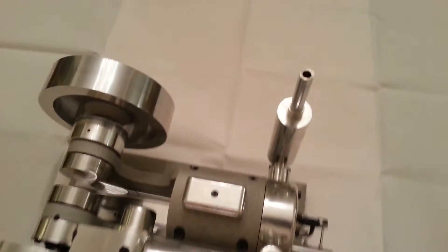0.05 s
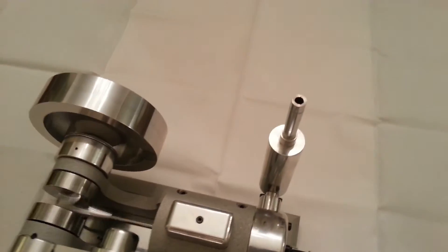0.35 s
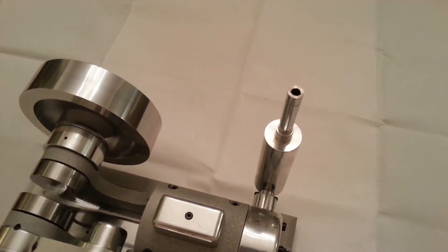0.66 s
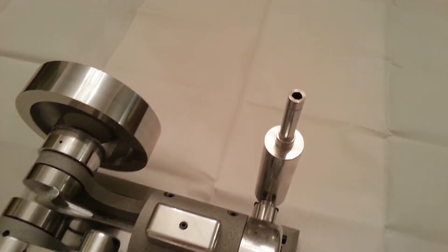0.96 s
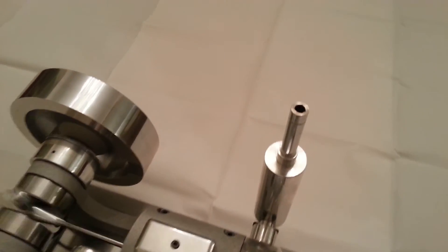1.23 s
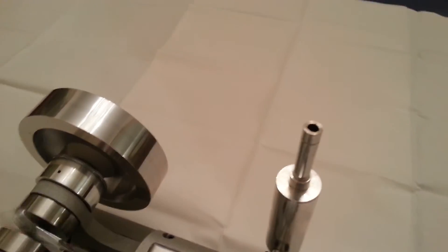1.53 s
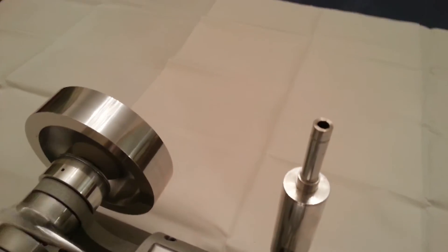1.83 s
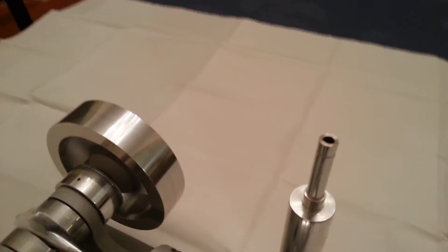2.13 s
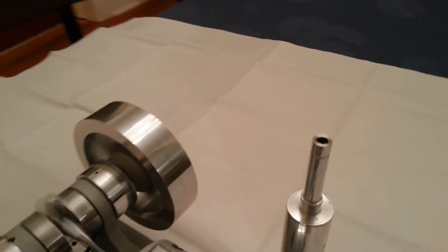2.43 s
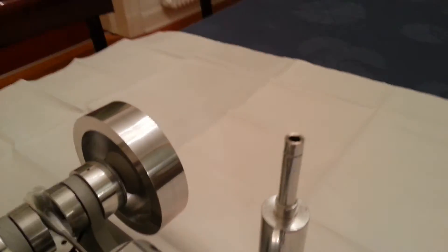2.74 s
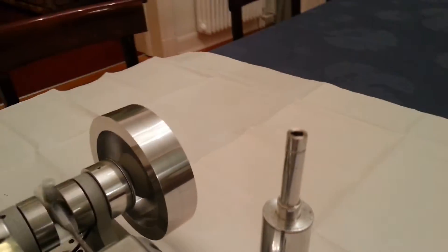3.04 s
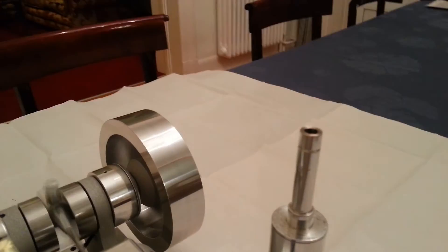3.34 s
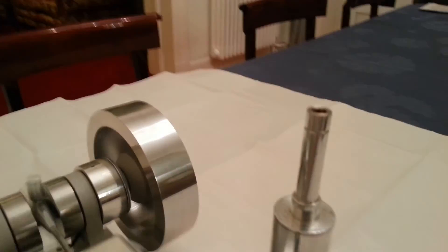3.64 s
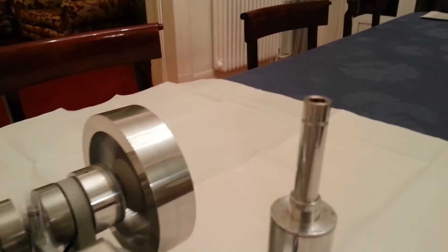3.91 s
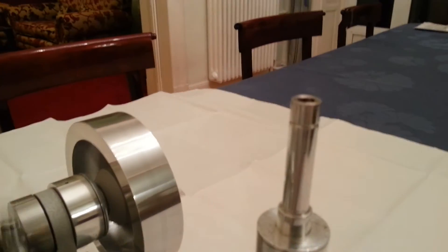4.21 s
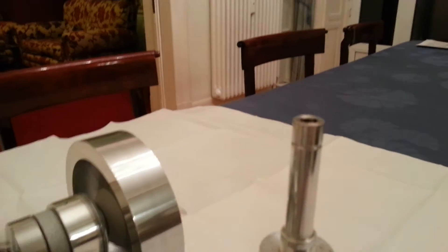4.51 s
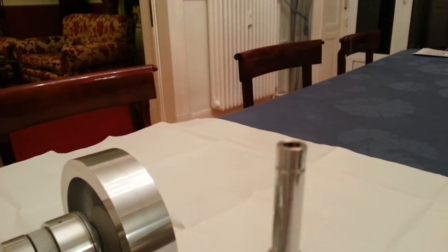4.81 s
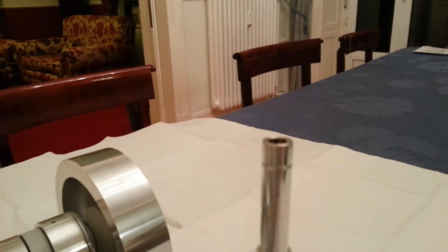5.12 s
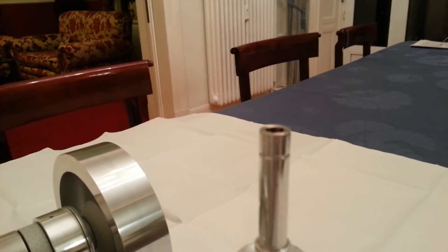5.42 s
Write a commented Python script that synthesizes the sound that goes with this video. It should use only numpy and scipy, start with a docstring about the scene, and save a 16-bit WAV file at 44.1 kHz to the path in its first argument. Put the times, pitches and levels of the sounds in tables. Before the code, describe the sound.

A small model engine runs close by with fast, regular pops over valve hiss and fine gear ticking in a room.

```python
"""A small flywheel model engine runs at about 6.6 cycles a second on a dining table, close to the
stereo microphones of a hand-held camera. Each cycle pops from the upright pipe with a crack of gas;
then the valve hisses, while the gear teeth tick and the table rumbles. Low throbs follow each pop
like its echo as the living room answers; the loudest pops thud, clip and make the limiter duck."""
import sys
import numpy as np
from scipy import signal
from scipy.fft import rfft, irfft, next_fast_len
from scipy.io import wavfile
from scipy.ndimage import uniform_filter1d, minimum_filter1d

SR = 44100
rng = np.random.default_rng(int(sys.argv[2]) if len(sys.argv) > 2 else 0)


def generate_wav(sig):
    """Save sig (samples, or channels by samples) to the path in sys.argv[1] as 16-bit PCM at SR."""
    pcm = np.round(np.clip(np.atleast_2d(sig).T, -1, 1) * 32767).astype(np.int16)
    wavfile.write(sys.argv[1], SR, pcm)


N = 249606
TIME = np.arange(N) / SR
FFT_SIZE = next_fast_len(N + SR)
FREQ = np.maximum(np.arange(FFT_SIZE // 2 + 1) * SR / FFT_SIZE, 1)


# The firings, close to the upright pipe.
# Each row: start in seconds, relative level of the pressure pulse in dB, that of the boom in dB.
PIPE_FIRINGS = [(.1032, -1, 6.5), (0.2509, -0.5, 4.5), (0.3971, 0.5, 7.5), (0.5454, 1, 8), (0.6965, 0, 6),
                (0.8479, -0.5, 4.5), (1.0016, -0.5, 4), (1.1549, -1, 11.5), (1.3096, 2.5, 8),
                (1.4645, 1, 11.5), (1.62, -1, 8.5), (1.774, 0.5, 13), (1.9275, 5, 20.5), (2.08, 1.5, 6.5),
                (2.2324, 1, 5.5), (2.384, 0.5, 5.5), (2.536, -1, 0), (2.688, -.5, 6), (2.8397, 0, 9.5),
                (2.991, 0, 9.5), (3.1408, 0.5, 4.5), (3.2915, 4, 8.5), (3.442, 2, 3.5), (3.5924, 2.5, 8.5),
                (3.744, 1.5, 6.5), (3.8957, 1, 5), (4.0472, 1, 2), (4.198, 0.5, 4.5), (4.3477, 1.5, 4),
                (4.4975, 0, -1.5), (4.649, 2, 8), (4.8008, 1, 8.5), (4.9527, 1.5, 12.5), (5.1045, 1.5, -8),
                (5.2577, 3, 3), (5.4104, 2, 3), (5.5628, 0.5, 5)]

def pops(boom_share=0.13, pop_db=-6, thud_db=-5):
    """A pressure pulse leaves the pipe and rings its air; booming firings push on for longer."""
    pulses, pushes = np.zeros((2, N))
    t = np.arange(SR // 100) / SR
    pulse = bump(t, peak=0.00065, width=0.00029)
    push = bump(t, peak=0.0016, width=0.00049)
    for start_s, pulse_db, boom_db in PIPE_FIRINGS:
        add(pulses, start_s, undb(pulse_db) * pulse)
        add(pushes, start_s, boom_share * (undb(boom_db) - undb(pulse_db)) * push)
    ringing = through(pulses, highpass(hz=162.6, width=49)) + through(pushes, highpass(hz=152, width=29))
    # a small opening radiates almost no bass
    radiated = through(ringing, highpass(hz=75, width=55))
    # a deep thud, much heavier on the strongest pops, as they overload the microphone
    overload = (np.maximum(pushes, 0) + 0.38 * pulses) ** 2
    thud = through(overload, band(hz=42, width=55))
    return undb(pop_db) * radiated + undb(thud_db) * thud


# High resonances of the gas crack at the pipe mouth, and lower ones down in the bore.
# Each row: centre in Hz, width in Hz, relative level at the left and right microphones in dB.
MOUTH_RESONANCES = [(5525, 740, 1.5, -4), (7864, 630, -10, 4.5), (10730, 680, -7.5, -4),
                    (13650, 634, -10.5, -8)]
BORE_RESONANCES = [(2030, 780, -14, -15), (3725, 630, -8, -13)]

def gas_cracks(bore_gain, open_s=0.0011, fall_s=0.0017, crack_db=-23, pan_db=-1.2,
               whistle_hz=6760, whistle_width=480, whistle_db=3, sag_hz_per_db=52,
               wander_hz=250, wander_db=2):
    """Gas bursts out behind each pulse, whistling at the mouth and ringing the bore; the jet wanders."""
    out, size = np.zeros((2, N)), 1024
    t = np.arange(size) / SR
    freq = np.arange(size // 2 + 1) * SR / size
    burst = np.minimum(t / open_s, 1) ** 2 * np.exp(-np.maximum(t - open_s, 0) / fall_s)
    wander = rng.standard_normal((len(PIPE_FIRINGS), 3))
    for (start_s, pulse_db, boom_db), (pitch, aim, grit) in zip(PIPE_FIRINGS, wander):
        force_db = 2.33 * pulse_db - 0.32 * boom_db  # a slow push cracks less
        hz = whistle_hz - sag_hz_per_db * pulse_db + wander_hz * pitch  # strong firings whistle lower
        whistle = (hz, whistle_width, whistle_db, whistle_db)
        mouth = undb(force_db) * resonances([*MOUTH_RESONANCES, whistle], freq)
        rasp_gain = bore_gain[int(start_s * SR)] * undb(pulse_db + wander_db * grit)
        bore = rasp_gain * resonances(BORE_RESONANCES, freq)
        jet = irfft(rfft(stereo_noise(likeness=0.4, size=size)) * np.hypot(mouth, bore))
        sides_db = (pan_db + wander_db * aim) * np.array([[1], [-1]]) / 2
        add(out, start_s, unit(burst * jet) * undb(crack_db + force_db + sides_db))
    return out


# The hiss of the valve from close by.
# Each row: frequency in Hz, relative level at the left and right microphones in dB.
VALVE_SPECTRUM = [(890, -2, -1), (1570, -7, -0.5), (2260, -3, -1.5), (2900, -2, -1), (3770, -0.5, -8),
                  (5500, 9, 7.5), (7200, -1, 11.5), (8300, -3.5, 2), (10000, 3, 4), (12600, -13, -1),
                  (14900, -34, -28)]

def valve_hiss(turn, opens=0.035, full=0.061, eases=0.48, shuts=0.51, hiss_db=-32, leak_db=-17):
    """Air rushes through the valve for the first half of the cycle and leaks a little for the rest."""
    valve = np.interp(turn % 1, [opens, full, eases, shuts], [0, 1, 1, 0])
    air = unit(through(stereo_noise(likeness=0.24, size=N), colour(VALVE_SPECTRUM)))
    return air * undb(hiss_db) * (valve + undb(leak_db))


def air_spit(turn, spit_db=-38):
    """At the height of the stroke the air is fastest and the hiss turns crisp."""
    flow = bump(turn % 1, peak=0.32, width=0.071)
    air = unit(through(stereo_noise(likeness=0.23, size=N), band(hz=13300, width=3000) ** 2))
    return undb(spit_db) * flow * air


# The ring of gears and bearings, and the brighter gear ring heard from the cylinder side.
# Each row: centre in Hz, width in Hz, relative level at the left and right microphones in dB.
METAL_RESONANCES = [(910, 950, 0.5, -1.5), (2140, 350, -5, 0.5), (3870, 450, 5.5, -1), (4690, 500, 8, 0),
                    (5820, 250, 9.5, 12), (7220, 550, 8, 12.5), (9160, 390, 0, -8), (11500, 2100, -10, -12),
                    (13700, 1300, -22, -12)]
BRIGHT_RESONANCE = [(9630, 440, -15, 7.5)]

def gears(turn, ring_gain, teeth=19, fall_s=0.00099, scatter_db=1, scatter_s=0.00034,
          tick_db=-30, rub_db=-42, load_db=1, ring_db=-2):
    """Each tooth ticks as it meets the next, the load swinging once a cycle; the bearings rub on."""
    tooth = np.floor(turn * teeth + 0.33)
    meetings = TIME[1:][np.diff(tooth) > 0]
    tick = np.exp(-np.arange(SR // 80) / SR / fall_s)
    ticks = np.zeros(N)
    for start_s, (strength, late) in zip(meetings, rng.standard_normal((len(meetings), 2))):
        add(ticks, start_s + scatter_s * late, tick * undb(tick_db + scatter_db * strength))
    load = undb(load_db * np.sin(2 * np.pi * turn))
    contact = stereo_noise(likeness=0.073, size=N) * (ticks + undb(rub_db)) * load
    metal = through(contact, unit(resonances(METAL_RESONANCES)))
    bright_ring = through(contact, resonances(BRIGHT_RESONANCE))
    return metal + ring_gain * undb(ring_db) * bright_ring


# The throbs of one cycle, the same in both microphones. Each row: delay after the pop in seconds,
# length in seconds, start pitch in Hz, end pitch in Hz, level in dB.
THROBS_AFTER_POP = [(.010, 0.023, 190, 236, -21), (0.03, 0.031, 243, 160, -27),
                    (.026, 0.013, 640, 610, -39.5), (0.038, 0.041, 345, 257, -38),
                    (0.0708, 0.025, 236, 138, -24.5), (0.092, 0.018, 270, 217, -32.5),
                    (.105, 0.05, 165.4, 126.6, -38)]

def low_throbs(starts, scatter_db=0.6, scatter_s=0.00058):
    """Low gliding throbs follow each pop, like its echo from the walls."""
    out = np.zeros(N)
    for delay_s, length_s, start_hz, end_hz, db in THROBS_AFTER_POP:
        progress = np.minimum(np.arange(int(length_s * SR) + 1) / (length_s * SR), 1)
        phase = 2 * np.pi * length_s * progress * (start_hz + (end_hz - start_hz) * progress / 2)
        throb = np.sin(np.pi * progress) * np.sin(phase)
        for start_s, (strength, late) in zip(starts, rng.standard_normal((len(starts), 2))):
            add(out, start_s + delay_s + scatter_s * late, throb * undb(db + scatter_db * strength))
    return out


# The rumble of the table under the engine. Each row: frequency in Hz, relative level in dB.
TABLE_SPECTRUM = [(25, -36), (60, -11), (130, -1.5), (300, 2), (480, -1.5), (620, -6.5), (900, -27),
                  (2000, -27), (4000, -53)]

def table_rumble(rumble_db=-44):
    """The running parts shake the table."""
    return undb(rumble_db) * unit(through(stereo_noise(likeness=0.69, size=N), colour(TABLE_SPECTRUM)))


# Standing waves of room and table top, where the camera is held.
# Each row: centre in Hz, width in Hz, gain in dB.
STANDING_MODES = [(114.2, 3.8, 1.5), (177.3, 11, -19.5), (244.5, 2.2, -26), (338, 83, -8.5),
                  (570, 6.1, -36), (633, 7.2, -0.5)]

def standing_waves(pop):
    """The pops set the air of the room and the table top ringing."""
    return through(pop, sum(undb(db) * band(hz, width) for hz, width, db in STANDING_MODES))


# The colour of the pops coming back from the room. Each row: frequency in Hz, relative gain in dB.
ROOM_SPECTRUM = [(40, -20), (110, 3), (165, 3.5), (290, 9), (470, 2), (620, 6), (850, 3.5), (1400, 13.5),
                 (3000, -10)]

def living_room(pop, treble, low_db=-13, high_db=-11):
    """The room answers diffusely, longer for the low pops than for the treble."""
    low = through(reflections(pop, t60_s=0.44, likeness=0.77, first_s=0.0036), colour(ROOM_SPECTRUM))
    high = reflections(treble, t60_s=0.19, likeness=0.9, first_s=0.0067)
    return undb(low_db) * low + undb(high_db) * high


def reflections(x, t60_s, likeness, first_s):
    """Dense reflections of a furnished room: a dying noise tail of unit energy per side."""
    t = TIME[:SR]
    onset = np.clip(t / first_s - 1, 0, 1)
    tail = stereo_noise(likeness, size=SR) * undb(-60 * t / t60_s) * onset
    tail /= np.sqrt(np.sum(tail ** 2) / 2)
    return through(x, rfft(tail, FFT_SIZE))


def undb(db):
    """Decibels to gain."""
    return 10 ** (np.asarray(db) / 20)


def unit(x):
    """Scale to rms 1."""
    return x / np.sqrt(np.mean(x ** 2))


def bump(x, peak, width):
    """Bell curve of height 1; peak and width are in the unit of x."""
    return np.exp(-0.5 * ((x - peak) / width) ** 2)


def through(x, response):
    """Pass a sound through a frequency response."""
    return irfft(rfft(x, FFT_SIZE) * response, FFT_SIZE)[..., :N]


def colour(table):
    """Responses through (Hz, dB, ..) points, one for each dB column."""
    hz, *columns = np.transpose(table)
    return np.array([undb(np.interp(np.log(FREQ), np.log(hz), db)) for db in columns])


def band(hz, width, freq=FREQ):
    """Resonance with gain 1 at its centre; width in Hz."""
    return 1j * freq * width / (hz ** 2 - freq ** 2 + 1j * freq * width)


def highpass(hz, width):
    """High-pass that rings at its corner."""
    return band(hz, width) * 1j * FREQ / width


def resonances(table, freq=FREQ):
    """Left and right gain of steep-skirted peaks, each 6 dB down about one width from its centre."""
    powers = (abs(band(hz, width * 2, freq)) ** 4 * undb([[left], [right]]) ** 2
              for hz, width, left, right in table)
    return np.sqrt(sum(powers))


def add(out, start_s, sound):
    """Mix a sound in at a time, cut to the length of the scene."""
    start = int(round(start_s * SR))
    first, end = max(start, 0), min(start + sound.shape[-1], N)
    if end > first:
        out[..., first:end] += sound[..., first - start:end - start]


def stereo_noise(likeness, size):
    """White noise at two microphones; likeness is the share of power they have in common."""
    shared, *own = rng.standard_normal((3, size))
    return np.sqrt(likeness) * shared + np.sqrt(1 - likeness) * np.array(own)


# The balance as the camera drifts round the engine. Each row: time in seconds, then gain in dB
# for the gears, the hiss, the crack, the bore rasp within it and the bright gear ring.
CAMERA_DRIFT = [(0.0, 1, -4, 7.5, -1.5, 2), (0.8, 1, -2.5, 6, 6.5, 3.5), (2.298, 2, -3.5, 5, 0.5, 3.5),
                (3.1, 1.5, -3, 1, 5, -15), (5.66, 1, -1, 1, 0, -6)]

def scene(left_lag_s=0.000022):
    """The engine's cycle drives its parts; the treble reaches the left microphone a little later."""
    fired = np.array(PIPE_FIRINGS)[:, 0]
    starts = np.r_[2 * fired[0] - fired[1], fired, 2 * fired[-1] - fired[-2]]  # a cycle more at each end
    turn = np.interp(TIME, starts, np.arange(len(starts)))  # running count of cycles
    drift_s, *drift_db = np.transpose(CAMERA_DRIFT)
    gains = (undb(np.interp(TIME, drift_s, db)) for db in drift_db)
    gear_gain, hiss_gain, crack_gain, bore_gain, ring_gain = gains
    pop = pops()
    treble = crack_gain * gas_cracks(bore_gain)
    treble += hiss_gain * (valve_hiss(turn) + air_spit(turn))
    treble += gear_gain * gears(turn, ring_gain)
    lag_s = np.array([[left_lag_s], [0]])
    treble = through(treble, np.exp(-2j * np.pi * FREQ * lag_s))
    room = standing_waves(pop) + living_room(pop, treble)
    return pop + treble + low_throbs(starts) + table_rumble() + room


def limiter(x, threshold_db=-3, hold_s=0.014, wait_s=0.0088, slew_s=0.013):
    """The camera turns down shortly after an overload and holds for a moment."""
    hold = int(hold_s * SR) // 2 * 2 + 1
    peak = -minimum_filter1d(-np.abs(x).max(axis=0), hold, origin=hold // 2)
    gain = 1 / np.maximum(peak / undb(threshold_db), 1)
    smoothed = uniform_filter1d(gain, int(slew_s * SR) + 1)
    return x * np.r_[np.ones(int(wait_s * SR)), smoothed][:N]


def record(dry, top_hz=14400):
    """Peaks that slip past the limiter clip in the converter; a steep low-pass cuts the top."""
    clipped = np.clip(limiter(dry), -1, 1)
    return signal.sosfilt(signal.ellip(8, 0.2, 70, top_hz, fs=SR, output="sos"), clipped)


dry = scene()
out = record(dry)
generate_wav(out)
```